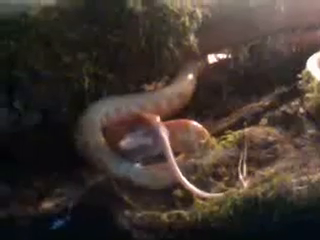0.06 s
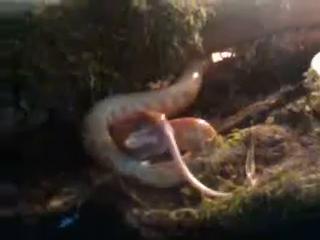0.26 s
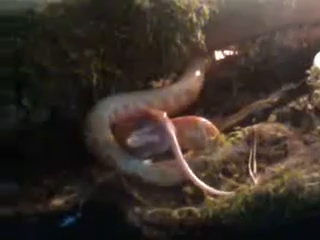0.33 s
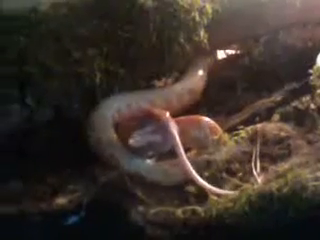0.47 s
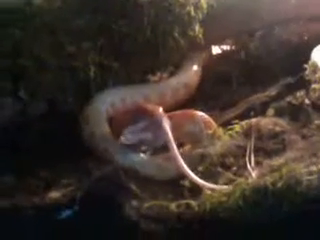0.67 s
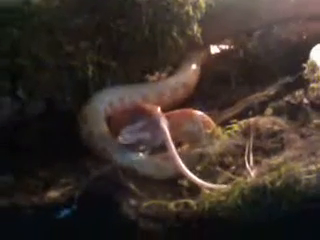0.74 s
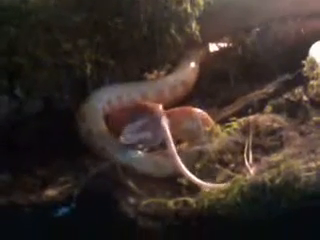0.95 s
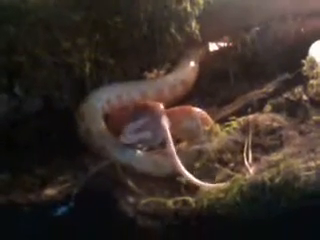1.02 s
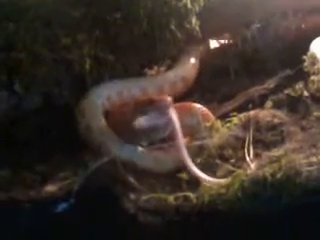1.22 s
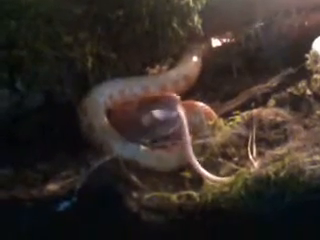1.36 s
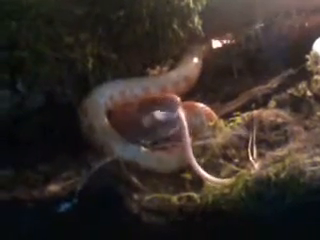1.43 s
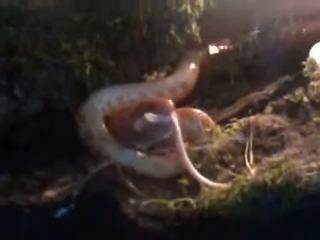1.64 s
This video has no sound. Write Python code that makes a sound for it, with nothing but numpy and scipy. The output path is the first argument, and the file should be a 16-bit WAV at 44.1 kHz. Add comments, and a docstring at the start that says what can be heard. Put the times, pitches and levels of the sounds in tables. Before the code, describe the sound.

Dry rustling scrapes come in brief, uneven bursts as a snake moves with its prey in a terrarium. A small tick comes first, a faint squeak of scales midway and a soft bump last, over steady low-level hiss.

```python
"""A snake shifts with its prey on dry moss and bark in a terrarium.
After 0.2 s of silence, quiet room hiss opens with a faint tick of a stalk.
From 0.39 s, seven short slides snag dry fibres: bright scrapes that ring briefly between hard walls.
Two more ticks, soft bumps and faint tones fall among them; near 1 s the scales squeak.
A last low bump at 1.44 s dies into the hiss."""
import sys
import numpy as np
from scipy import signal
from scipy.fft import rfft, irfft
from scipy.io import wavfile
from scipy.ndimage import uniform_filter1d

SR = 44100
rng = np.random.default_rng(int(sys.argv[2]) if len(sys.argv) > 2 else 0)


def generate_wav(signal):
    """Clip the signal to [-1, 1] and save it as 16-bit WAV at the path in sys.argv[1]."""
    frames = np.transpose(np.atleast_2d(signal))
    scaled = np.clip(frames, -1, 1) * 32767
    pcm = np.round(scaled).astype(np.int16)
    wavfile.write(sys.argv[1], SR, pcm)


N = 74970
TIME_S = np.arange(N) / SR

# slides: start_s, rise_s, hold_s, level_db, body_db, edge_db, fibres [(pitch_hz, relative_db)]
SLIDE_EVENTS = [(0.390, 0.012, 0.015, -39.5, 2.5, 1, [(5750, -4), (4350, -7.5)]),
                (0.77, 0.017, 0.02, -37, -1, -1, [(4720, -3.5), (4180, -5.5), (5530, -6.5), (3150, -10)]),
                (0.909, .010, 0.03, -40, 0.5, 2.5, [(5640, -7), (4180, -7.5), (6420, -10.5)]),
                (0.985, 0.016, 0.022, -50.5, 5, 5.5, []), (1.022, 0.016, 0.022, -37, 1.5, 3, [(5860, -8.5),
                (1092, -20.5)]), (1.232, 0.0094, 0.013, -43.5, -1, 0.5, []),
                (1.310, 0.022, 0.015, -41.5, 0, 0.5, [(6400, -10), (2380, -13.5)])]
# scrape spectrum: freq_hz, relative_db
SCRAPE_SPECTRUM = [(150, -50), (400, -26), (800, -19), (1050, -13), (1600, -17), (2450, -7.5), (2900, -7.5),
                   (3400, -8.5), (4200, 0.5), (4750, -2.5), (5250, -4), (5700, 0), (6400, -2), (7100, -7.5),
                   (7600, -20.5)]
# squeak contour: time_s, pitch_hz, level_db
SQUEAK_CONTOUR = [(0.986, 2236, -56), (1.013, 2350, -55), (1.046, 2459, -50), (1.076, 2310, -52),
                  (1.106, 2070, -59.5), (1.125, 2060, -64)]
# stalk ticks: start_s, level_db, pitch_hz
STALK_TICKS = [(0.208, -47.5, 3600), (0.634, -45, 3610), (0.728, -53.5, 5300)]
# body bumps: start_s, level_db, pitch_hz, t60_s
BODY_BUMPS = [(0.400, -66, 405, .2), (1.235, -61.5, 368, 0.14), (1.237, -64.5, 530, .12),
              (1.437, -61, 243, 0.32)]
# swelling tones: centre_s, half_length_s, pitch_hz, level_db
TONE_SWELLS = [(0.736, 0.042, 1100, -62), (1.160, 0.025, 1020, -62), (1.108, 0.051, 182, -75.5)]
# room hiss spectrum: freq_hz, relative_db
HISS_SPECTRUM = [(20, -8.5), (55, -8), (100, -29), (145, -24), (185, -16), (290, -8), (370, -1.5),
                 (500, -3.5), (800, 1), (1400, 0.5), (2200, 1), (2900, -2), (4100, -2), (5500, -6),
                 (7000, -9.5), (7600, -28)]
# wavering room tones: pitch_hz, width_hz, level_db
ROOM_DRONES = [(183.7, 14, -85.5), (384.7, 14, -76.5), (1006, 17.6, -72.5), (1385, 20, -70.5),
               (1981, 50, -67)]


def slides(scrape_decay_s=0.025, ring_decay_s=0.029, fibre_width_hz=144.4):
    """Each slide swells, holds and lets go. Returns the broad scrapes and the ring of rubbed fibres."""
    scrapes, rings = np.zeros(N), np.zeros(N)
    for start_s, rise_s, hold_s, level_db, body_db, edge_db, fibres in SLIDE_EVENTS:
        age_s = TIME_S - start_s
        released_s = np.maximum(age_s - rise_s - hold_s, 0)
        swell = from_db(level_db) * np.clip(age_s / rise_s, 0, 1)
        scrape = shelves(coloured(friction(), SCRAPE_SPECTRUM), body_db, edge_db)
        scrapes += swell * np.exp(-released_s / scrape_decay_s) * scrape
        for pitch_hz, relative_db in fibres:
            ring = from_db(relative_db) * narrow_tone(pitch_hz, fibre_width_hz)
            rings += swell * np.exp(-released_s / ring_decay_s) * ring
    return scrapes, rings


def friction(snags_per_s=2300, spread_db=3, rub_db=0.5):
    """Random snags of uneven size on top of smooth rubbing."""
    sizes = from_db(spread_db * np.minimum(rng.exponential(1, N), 4))
    signs = rng.choice([-1, 1], N)
    snagged = rng.random(N) < snags_per_s / SR
    return rms_one(sizes * signs * snagged) + from_db(rub_db) * rng.standard_normal(N)


def squeak(width_hz=140):
    """Scales under pressure stick and slip at a rough, arching pitch."""
    time_s, pitch_hz, level_db = np.transpose(SQUEAK_CONTOUR)
    active = (TIME_S > time_s[0]) & (TIME_S < time_s[-1])
    envelope = from_db(np.interp(TIME_S, time_s, level_db)) * active
    return envelope * narrow_tone(np.interp(TIME_S, time_s, pitch_hz), width_hz)


def ticks(decay_s=0.013, width_hz=650):
    """Single stalks give way, each with a tiny, fast-dying crackle."""
    out = np.zeros(N)
    for start_s, level_db, pitch_hz in STALK_TICKS:
        age_s = np.maximum(TIME_S - start_s, 0)
        crackle = rms_one(resonance(friction(), pitch_hz, width_hz))
        out += from_db(level_db) * (age_s > 0) * np.exp(-age_s / decay_s) * crackle
    return out


def bumps(attack_s=0.012):
    """The body nudges the furnishings, which answer with low, dying tones."""
    out = np.zeros(N)
    for start_s, level_db, pitch_hz, t60_s in BODY_BUMPS:
        age_s = np.maximum(TIME_S - start_s, 0)
        envelope = from_db(level_db - 60 * age_s / t60_s) * np.minimum(age_s / attack_s, 1)
        out += envelope * np.sin(2 * np.pi * pitch_hz * age_s)
    return out


def tank(x, t60_s=0.23, gap_s=0.002, wet_to_dry_db=-0.5):
    """Dense reflections between hard walls, dying evenly."""
    tail = rng.standard_normal(N) * from_db(-60 * TIME_S / t60_s) * (TIME_S > gap_s)
    wet = signal.fftconvolve(x, tail / np.sqrt(np.sum(tail ** 2)))[:N]
    wet_gain = from_db(wet_to_dry_db)
    return (x + wet_gain * wet) / np.sqrt(1 + wet_gain ** 2)  # keeps the power


def swells(width_hz=8.2):
    """Faint tones rise out of the hiss and fade."""
    out = np.zeros(N)
    for centre_s, half_length_s, pitch_hz, level_db in TONE_SWELLS:
        envelope = from_db(level_db) * np.exp(-((TIME_S - centre_s) / half_length_s) ** 2)
        out += envelope * narrow_tone(pitch_hz, width_hz)
    return out


def room_air(hiss_db=-54.5):
    """Even hiss with a few faint, wavering tones."""
    drones = sum(from_db(db) * narrow_tone(hz, width_hz) for hz, width_hz, db in ROOM_DRONES)
    return from_db(hiss_db) * coloured(rng.standard_normal(N), HISS_SPECTRUM) + drones


def narrow_tone(pitch_hz, width_hz):
    """Wandering phase smears a tone over a narrow band; the pitch may glide."""
    wander_rad = np.cumsum(rng.standard_normal(N)) * np.sqrt(2 * np.pi * width_hz / SR)
    wander_rad = uniform_filter1d(wander_rad, size=max(int(SR / (4 * width_hz)), 1))
    phase_rad = 2 * np.pi * np.cumsum(pitch_hz * np.ones(N)) / SR
    return np.sqrt(2) * np.sin(phase_rad + wander_rad)


def coloured(x, spectrum):
    """Shape by (freq_hz, relative_db) points, cut above SR / 5; unit rms."""
    points_hz, points_db = np.transpose(spectrum)
    freq_hz = np.maximum(np.arange(N // 2 + 1) * SR / N, 1)
    gain = from_db(np.interp(np.log(freq_hz), np.log(points_hz), points_db)) * (freq_hz < SR / 5)
    return rms_one(irfft(rfft(x) * gain, N))


def shelves(x, body_db, edge_db, body_hz=3170, edge_hz=4850):
    """Low shelf for the body, high shelf for the edge."""
    freq_hz = np.arange(N // 2 + 1) * SR / N
    body = 1 / (1 + (freq_hz / body_hz) ** 12)
    edge = 1 - 1 / (1 + (freq_hz / edge_hz) ** 24)
    return irfft(rfft(x) * from_db(body_db * body + edge_db * edge), N)


def resonance(x, pitch_hz, width_hz):
    """Two-pole resonance, unit peak gain."""
    radius = np.exp(-np.pi * width_hz / SR)
    feedback = [1, -2 * radius * np.cos(2 * np.pi * pitch_hz / SR), radius ** 2]
    return signal.lfilter(np.array([1, 0, -1]) * (1 - radius ** 2) / 2, feedback, x)


def from_db(db):
    """Decibels to gain."""
    return 10 ** (np.asarray(db) / 20)


def rms_one(x):
    """Scale to unit rms."""
    return x / np.sqrt(np.mean(x ** 2) + 1e-20)


def scene():
    """The snake in its tank, in a quiet room; mono."""
    scrapes, rings = slides()
    return (tank(scrapes + ticks()) + rings + squeak() + bumps() + swells() + room_air())[None]


def record(dry):
    """Add a steady amplifier offset, open after a short silence, cut the top steeply."""
    offset, open_s, fade_s, cutoff_hz = 0.001, 0.204, 0.00086, 7200
    opened = (dry + offset) * np.clip((TIME_S - open_s) / fade_s, 0, 1)
    return signal.sosfilt(signal.butter(32, cutoff_hz, fs=SR, output="sos"), opened)


dry = scene()
out = record(dry)
generate_wav(out)
```